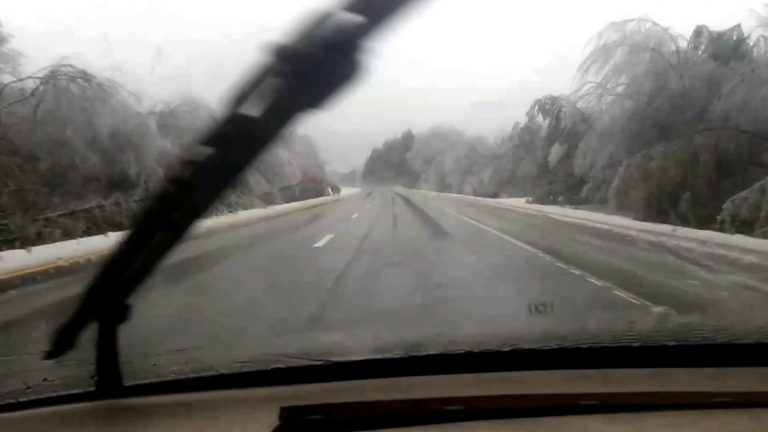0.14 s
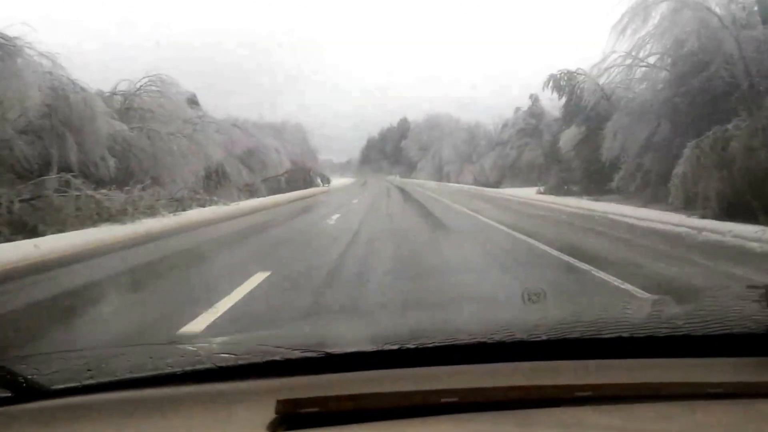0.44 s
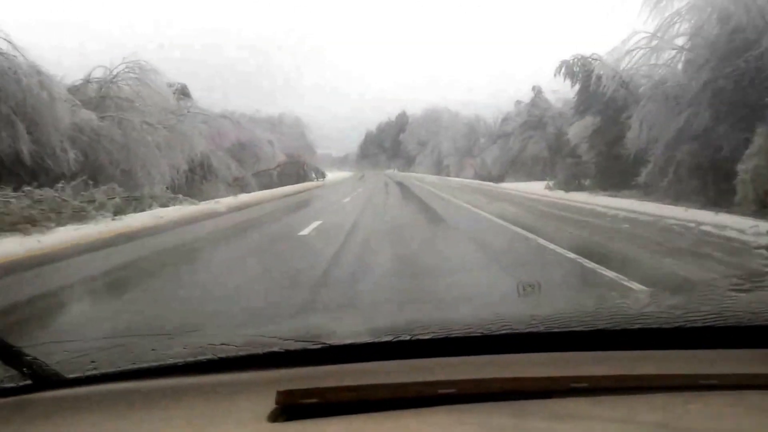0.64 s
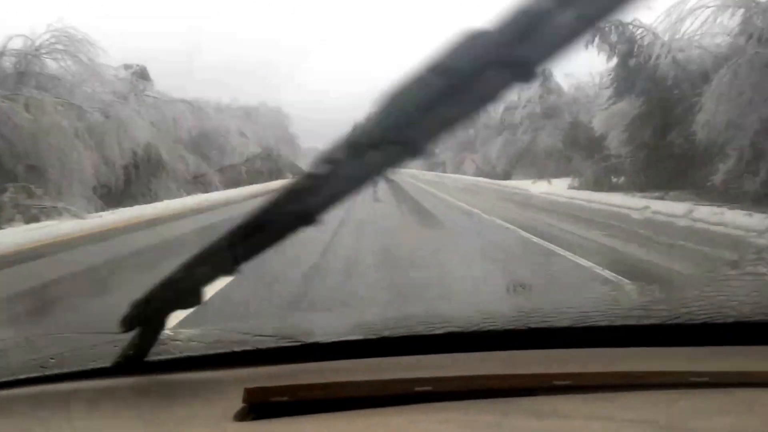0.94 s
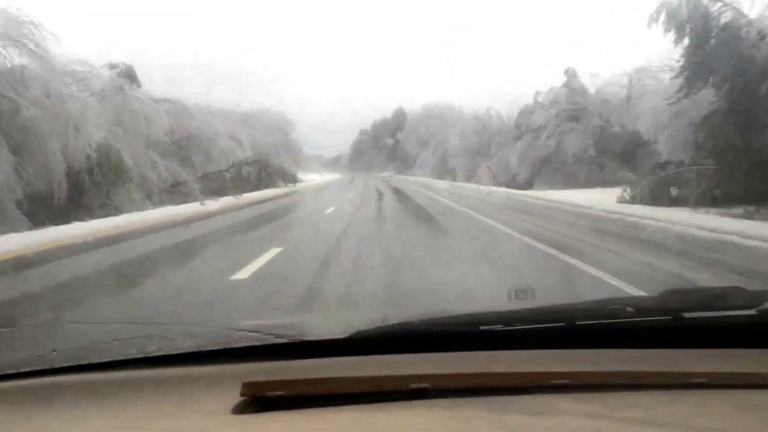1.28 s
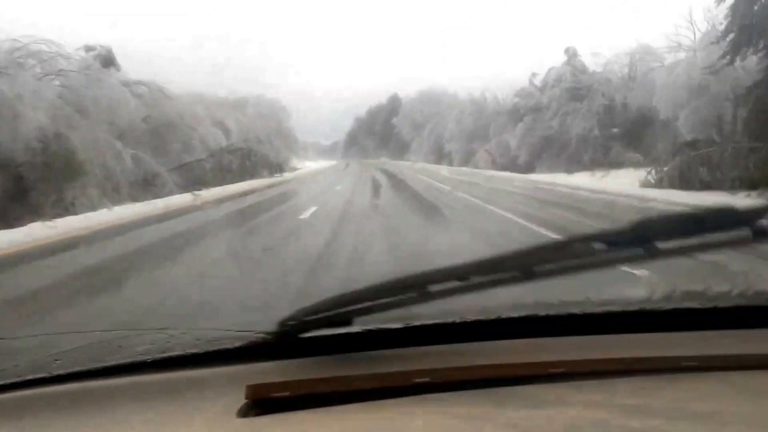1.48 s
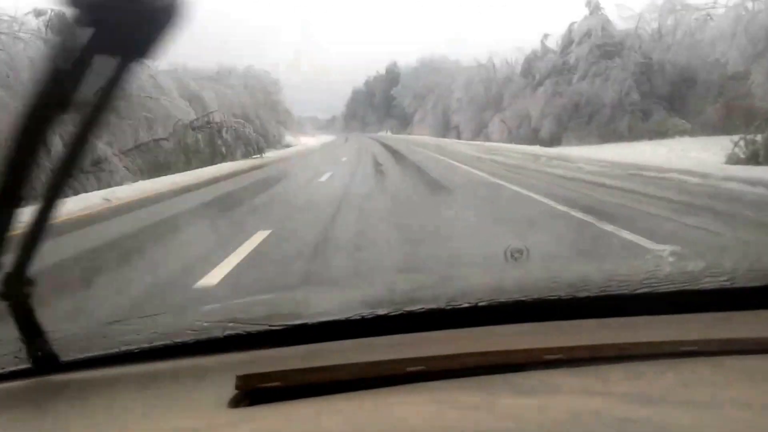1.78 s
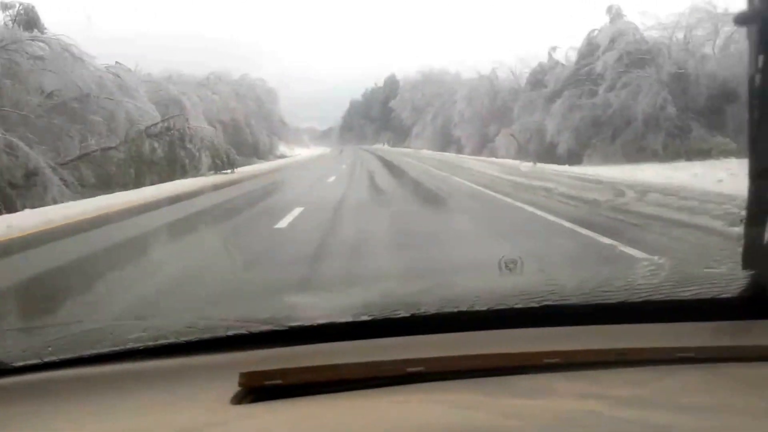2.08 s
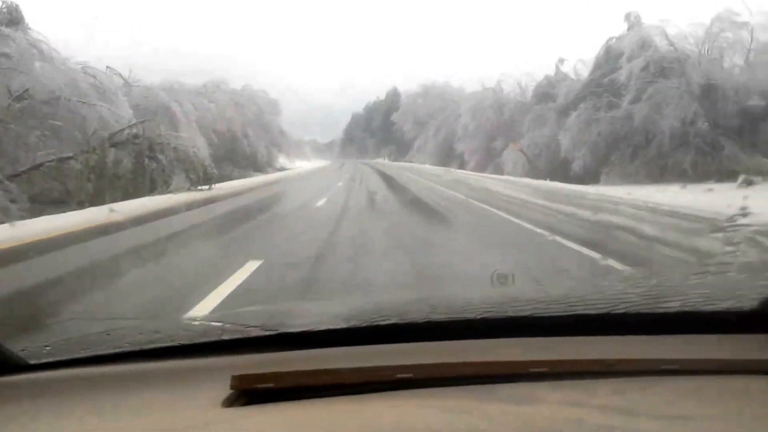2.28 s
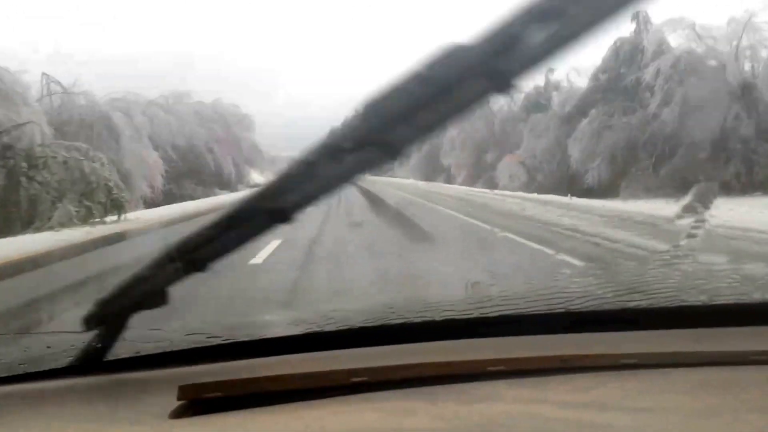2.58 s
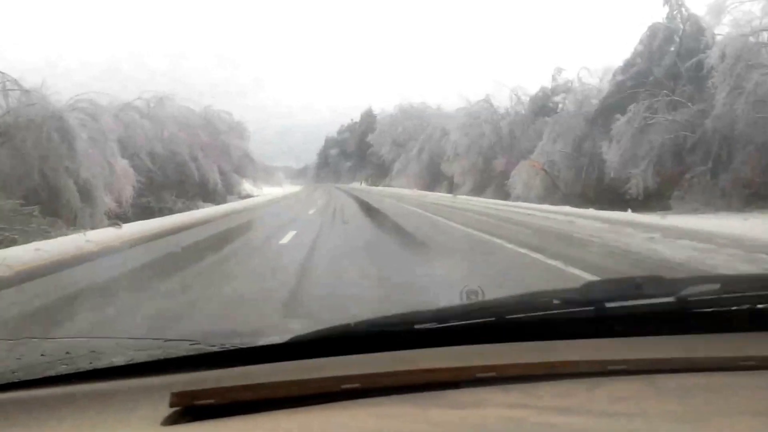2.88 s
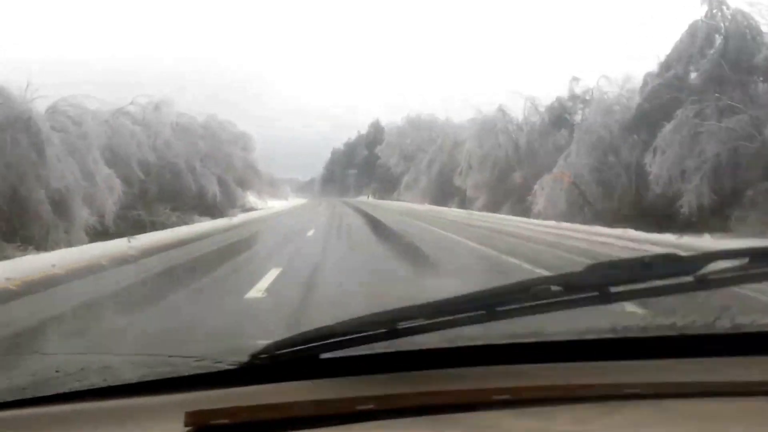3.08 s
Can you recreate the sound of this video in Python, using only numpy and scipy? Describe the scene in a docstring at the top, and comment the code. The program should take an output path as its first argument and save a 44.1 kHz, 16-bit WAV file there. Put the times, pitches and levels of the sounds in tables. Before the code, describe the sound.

Inside a moving car on a wet, icy highway, low tyre rumble and spray hiss continue while sleet patters and ticks on the windscreen, mostly left; everything sags around two seconds, then returns. Close stereo cabin microphones.

```python
"""Tyre rumble and hiss are heard first, then almost at once a sharp tick of sleet on glass.
Place: the small cabin of a car on a wet, icy highway, with two microphones inside.
Shaped noise makes the rumble and spray; wavering tones make the booms, panel hum and faint drivetrain whine.
Pellets ring the windscreen, mostly on the left, with close reflections; many small ones make the patter.
Rumble, spray and patter sag for about a second; a limiter ducks most around the hardest pellet."""
import sys
import numpy as np
from scipy import signal
from scipy.fft import rfft, irfft
from scipy.io import wavfile
from scipy.ndimage import uniform_filter1d, minimum_filter1d

SR = 44100
rng = np.random.default_rng(int(sys.argv[2]) if len(sys.argv) > 2 else 0)


def bounce(signal):
    """Save signal as a 16-bit WAV file at the path given by the first command-line argument."""
    frames = np.transpose(np.atleast_2d(signal))
    limited = np.clip(frames, -1, 1)
    pcm = np.round(limited * 32767).astype(np.int16)
    wavfile.write(sys.argv[1], SR, pcm)


N = 142443  # length [samples]


# Rumble common to both microphones: (frequency [Hz], relative density [dB per Hz])
RUMBLE_SPECTRUM = [(15, -32), (30, -11.5), (48, -7), (60, -5), (75, -1), (98, -3), (114, 0), (138, 0.5),
                   (175, -5), (200, -6.5), (225, -8), (255, -12.5), (300, -11.5), (355, -13.5), (440, -15),
                   (560, -20.5), (800, -23), (1100, -37), (2000, -42), (5000, -90)]
# Rumble that differs between the microphones: (frequency [Hz], relative density [dB per Hz])
RUMBLE_SIDE_SPECTRUM = [(20, -27), (70, 4), (150, 10), (300, 9), (460, -0.5), (600, 5.5), (900, -39),
                        (1400, 3.5), (2200, -5), (5000, -110)]
RUMBLE_DB, RUMBLE_SIDE_DB = -20.5, -36.5  # rms before the swells and the sag
ROAR_HZ, ROAR_SWELL_DB, ROAR_SWELL_PER_S = 223, 1.23, 10.7  # above this the rumble swells on its own


def road():
    """Tyre rumble through the body, nearly the same at both microphones, with an unevenly swelling upper roar."""
    common = level(noise(RUMBLE_SPECTRUM)[0], RUMBLE_DB) + panels_and_whine()
    side = level(noise(RUMBLE_SIDE_SPECTRUM), RUMBLE_SIDE_DB)
    rumble = from_right(common) + side * np.array([[1], [-1]])
    high_pass = signal.butter(2, ROAR_HZ, "high", fs=SR, output="sos")
    roar = signal.sosfiltfilt(high_pass, rumble)
    swell = undb(ROAR_SWELL_DB * walk(ROAR_SWELL_PER_S))
    return rumble + roar * (swell - 1)


# Three body panels, then the drivetrain whine: (pitch [Hz], rms level [dB], pitch wander [share])
PANEL_AND_WHINE_TONES = [(219, -38.5, 0.061), (298.7, -38.5, 0.0595), (416.3, -42, .06),
                         (929, -47.5, 0.00708)]
TONE_FLICKER_DB, TONE_FLICKER_PER_S = 4.5, 24


def panels_and_whine():
    """Body panels hum on and off and the drivetrain whines brokenly: tones of wandering pitch and strength."""
    out = np.zeros(N)
    for hz, db, wander in PANEL_AND_WHINE_TONES:
        tone = waver(hz, wander)
        flicker = undb(TONE_FLICKER_DB * walk(TONE_FLICKER_PER_S))
        out += level(tone * flicker, db)
    return out


# Bumps that set the body booming: (time of the height [s], pitch [Hz], rms level before the fade [dB])
ROAD_BUMPS = [(.08, 112.6, -30), (.12, 291, -33), (0.219, 130.5, -25), (.38, 112, -22), (.40, 300, -26.5),
              (.53, 140, -21), (.77, 114.7, -23), (.81, 196, -26), (.88, 490, -29), (.96, 108.3, -22),
              (1.08, 134.4, -26), (1.11, 405.5, -32), (1.29, 115.8, -19.5), (1.63, 131.1, -31),
              (1.82, 127.1, -27.5), (2.39, 245, -29), (2.46, 114.9, -20), (2.58, 110.1, -24.5),
              (2.61, 288, -31), (2.76, 137.3, -21), (2.82, 330, -28.5), (2.92, 123.2, -16.5),
              (3.03, 124, -19.5), (3.22, 104.9, -18.5)]
BUMP_CYCLES, BOOM_WANDER = 6.2, .07  # cycles from the height to 1/e either side; pitch wander [share]


def bumps():
    """Each bump swells a short, wavering boom in the body; higher panels fade sooner."""
    t = np.arange(N) / SR
    booms = np.zeros(N)
    for s, hz, db in ROAD_BUMPS:
        fade = np.exp(-((t - s) * hz / BUMP_CYCLES) ** 2)
        booms += level(waver(hz, BOOM_WANDER), db) * fade
    return from_right(booms)


LEFT_LAG_S = 0.00021  # the road reaches the right microphone first


def from_right(x):
    """A sound that reaches the left microphone slightly late."""
    t = np.arange(N) / SR
    return np.array([np.interp(t - LEFT_LAG_S, t, x), x])


# Hard pellets on the windscreen, before the limiter:
# (time [s], peak of the ring [dB], crack relative to it [dB], reflections relative to it [dB])
HARD_PELLETS = [(.0408, -7, -1, -11), (.1781, -11, -15, 1), (.2962, -9, -18, -0.5), (.3447, -8, -10, -1),
                (.4173, -9, -14, -14), (.4345, -16, -22, -6), (.4570, -5.5, -19, -4), (.4781, -12, -25, -4),
                (.5548, -9, -20, 2), (.5908, -9.5, -17, -2), (.6138, -10.5, -20, 3), (.6330, -14, -22, -5),
                (.6782, -10, -22, 4.5), (.6840, -18, -22, 9), (.7639, -12.5, -22, 0), (.8353, -7.5, -9, -6),
                (.9874, -10, -22, 4), (1.0497, -15, -20, -1), (1.1500, 1, -10, -11), (1.2424, -9, -22, -3),
                (1.2789, -16, -25, -7), (1.3802, 9, -5, -6.5), (1.3903, -2, -18, 3), (1.5702, -16, -13, -3),
                (1.5874, -22, -10, -7), (1.7168, -15.5, -20, -1), (1.7755, -20, -20, 4),
                (1.8690, -16.5, -14, 0), (2.0579, -23, -18, -1), (2.1299, -13.5, -9, 2.5),
                (2.1522, -21.5, -3, -8), (2.2756, -18, -12, -5), (2.3148, -14, -18, -1),
                (2.3909, -25, -22, -5), (2.4712, -13, -20, -8), (2.6660, -14, -18, 0),
                (2.7746, -17, -12, -9), (2.7846, -0.5, -21, -2.5), (2.8266, -7.5, -16, 1.5),
                (2.8520, -7.5, -20, -2), (2.9024, -8, -10, -5), (2.9290, -16.5, -22, 4),
                (2.9776, -11.5, -25, -4), (3.1420, -3, -27, -9), (3.1932, -9.5, -23, -3)]


def pellets():
    """Hard single pellets tick sharply, each on its own spot of the glass."""
    out = np.zeros((2, N))
    for s, db, crack_db, echo_db in HARD_PELLETS:
        start = int(s * SR)
        tick = impact(crack_db, echo_db)[:, :N - start]
        out[:, start:start + tick.shape[1]] += undb(db) * tick
    return out


# Ring of the glass under a pellet: (frequency [Hz], left relative level [dB], right relative level [dB])
GLASS_RING = [(300, -71, -32), (1830, -26, -46), (2680, -7.5, -30), (3640, -5.5, -10.5), (4760, -5, -12),
              (5740, -2, -14), (6880, -2, -9.5), (7830, -10, -14.5), (10050, -21, -19.5),
              (10070, -51, -18.5), (12300, -78, -29), (14300, -69, -28), (17700, -50, -103)]
PING_HZ, PING_SCATTER, PING_DECAY_S = 6680, .03, .00014  # scatter is a share of the pitch
RIGHT_LAG_S = .0001  # at most: the glass is nearer the left microphone
CRACK_HZ, CRACK_LEFT_DB = 7500, -10  # the crack is weaker on the left
ECHO_DELAY_S = 0.0018  # both tails begin after this
ECHO_DECAY_S, ECHO_DB = 0.0029, 3  # dashboard and side glass
CABIN_DECAY_S, CABIN_DB = 0.013, -4.5


def impact(crack_db, echo_db, size=4096):
    """One spot on the windscreen: a bright crack, a ping of a few cycles, close reflections, a brief cabin tail."""
    t = np.arange(size) / SR
    hz = PING_HZ * (1 + PING_SCATTER * rng.standard_normal())  # pitch differs from spot to spot
    lag = np.array([[0], [RIGHT_LAG_S * rng.random()]])
    arrived = np.maximum(t - lag, 0)
    ping = arrived * np.sin(2 * np.pi * hz * arrived) * np.exp(-arrived / PING_DECAY_S)
    ring = response(GLASS_RING)[:, :size // 8]
    ring = ring / np.abs(ring).max()
    direct = signal.fftconvolve(ping, ring, axes=1)

    high_pass = signal.butter(2, CRACK_HZ, "high", fs=SR, output="sos")
    snap = signal.sosfilt(high_pass, signal.unit_impulse(direct.shape[1]))
    crack = snap * undb([[crack_db + CRACK_LEFT_DB], [crack_db]])

    echo = undb(ECHO_DB) * tail(ECHO_DECAY_S, size)
    cabin = undb(CABIN_DB) * tail(CABIN_DECAY_S, size)
    reflections = signal.fftconvolve(echo + cabin, ring, axes=1)
    return direct / np.abs(direct).max() + crack + undb(echo_db) * reflections


def tail(decay, size):
    """Dense reflections as delayed, fading noise, unrelated at the two microphones and of about unit energy."""
    age = np.arange(size) / SR - ECHO_DELAY_S
    fade = (age > 0) * np.exp(-np.abs(age) / decay)
    return rng.standard_normal((2, size)) * fade * np.sqrt(2 / (decay * SR))


# Strength of the patter, on top of the sag: (time [s], level [dB])
SLEET_STRENGTH = [(0, -1), (.4, -2.5), (.6, 1), (.8, -3), (1.1, -2), (1.3, 1.5), (1.52, 3), (1.65, -5.5),
                  (1.9, -2.5), (2.1, -.5), (2.2, -10.5), (2.4, -2.5), (2.65, -1.5), (2.88, -0.5),
                  (3.05, -4.5), (3.23, -5)]
PATTER_PER_S, PATTER_SCATTER_DB = 800, 3.3  # the scatter scales an exponential draw
PATTER_DB = -28.5  # rms before the sleet strength and the sag
PATTER_CRACK_DB, PATTER_ECHO_DB = -26, -2.5  # relative to the peak of each ring


def patter(count=12):
    """Many small pellets of scattered size, landing on a dozen spots of the windscreen."""
    out = 0
    for _ in range(count):
        lands = rng.random(N) < PATTER_PER_S / count / SR
        size_db = PATTER_SCATTER_DB * np.minimum(rng.exponential(size=N), 4.5)
        hits = (lands * undb(size_db))[None]
        spot = impact(PATTER_CRACK_DB, PATTER_ECHO_DB)
        out = out + signal.fftconvolve(hits, spot, axes=1)[:, :N]
    return level(out, PATTER_DB) * undb(curve(SLEET_STRENGTH))


# Modes of the wiper arm: (pitch [Hz], level at the start [dB])
WIPER_MODES = [(900, -43), (1030, -21), (1130, -39)]
KNOCK_S, KNOCK_DECAY_S = .0765, 0.0073


def wiper_knock():
    """One soft, dull knock of the wiper arm: a few close modes that die away together."""
    age = np.maximum(np.arange(N) / SR - KNOCK_S, 0)
    modes = sum(undb(db) * np.sin(2 * np.pi * hz * age) for hz, db in WIPER_MODES)
    return modes * np.exp(-age / KNOCK_DECAY_S)


# Tyre spray and air rush: (frequency [Hz], left relative density [dB per Hz], right [dB per Hz])
SPRAY_SPECTRUM = [(296, -31.5, -30), (796, 0.5, 0), (1680, -2, -5), (2000, -3.5, -8.5), (2720, 1, -2.5),
                  (3200, -5, -8), (4140, -4, -15), (7000, -1, -22), (8660, -14, -11), (9360, -13, -20.5),
                  (10500, -53, -24), (12300, -70, -26), (14500, -48, -38)]
SPRAY_DB = -30  # rms before the sag
SPRAY_FLICKER_DB, SPRAY_FLICKER_PER_S = 1.14, 25.05


def spray():
    """Flickering hiss of water off the tyres and air over the glass, as shaped noise."""
    flicker = undb(SPRAY_FLICKER_DB * walk(SPRAY_FLICKER_PER_S))
    return level(noise(SPRAY_SPECTRUM) * flicker, SPRAY_DB)


def undb(db):
    """Decibels to gain."""
    return 10 ** (np.asarray(db) / 20)


def level(x, db):
    """Scale to an rms level."""
    return x * undb(db) / np.sqrt(np.mean(x ** 2))


def curve(rows):
    """Join (time [s], value) rows by straight lines."""
    return np.interp(np.arange(N) / SR, *np.array(rows).T)


def walk(rate):
    """Slow random wander with a spread near 1, from a smoothed new value at each step of the rate [per s]."""
    k = int(SR / rate)
    steps = np.repeat(rng.standard_normal(N // k + 1), k)
    return 1.29 * uniform_filter1d(uniform_filter1d(steps, k), k)[:N]


def waver(hz, wander):
    """A tone whose pitch wanders by a share of itself."""
    cycles = np.cumsum(hz * (1 + wander * walk(40))) / SR
    return np.sin(2 * np.pi * (rng.random() + cycles))


def response(rows, size=8192):
    """Causal (minimum-phase) impulse responses, one for each dB column of a spectrum table."""
    hz, *columns = np.array(rows, float).T
    grid = np.log(np.maximum(np.fft.rfftfreq(size, 1 / SR), 1))
    log_gains = [np.log(undb(np.interp(grid, np.log(hz), db))) for db in columns]
    cepstrum = irfft(log_gains)
    cepstrum[:, 1:size // 2] *= 2  # folding the cepstrum makes the response causal
    cepstrum[:, size // 2 + 1:] = 0
    return irfft(np.exp(rfft(cepstrum)))


def noise(rows):
    """Unrelated noise for each dB column of a spectrum table."""
    ir = response(rows)
    white = rng.standard_normal((len(ir), N + ir.shape[1] - 1))
    return signal.fftconvolve(white, ir, mode="valid", axes=1)


# Overall level of the ride: (time [s], level [dB])
RIDE_SAG = [(0, 1), (1.0, 0.5), (1.33, 2), (1.55, -3), (1.8, -7.5), (2.0, -7.5), (2.22, -8), (2.42, -2),
            (2.7, -0.5), (2.95, 0), (3.23, 0.5)]
# Swells of the rumble with the road surface: (time [s], level [dB])
ROAD_SURFACE = [(0, 2), (.12, 2), (.25, 1), (.39, .5), (.47, 0.5), (.65, 0), (.92, 0.5), (1.1, 0),
                (1.18, -1.5), (1.25, -1.5), (1.45, -2), (1.65, 0), (1.85, 0), (2.08, -2.5), (2.2, 1),
                (2.42, -1.5), (2.7, -1), (2.77, -2), (2.88, 1), (3.1, 0), (3.23, 0)]
RUMBLE_SAG = 0.79  # share of the sag, in dB, that the rumble takes


def scene():
    """Road, spray and patter rise and sag together under the booms, the hard ticks and the knock."""
    sag_db = curve(RIDE_SAG)
    rumble = road() * undb(RUMBLE_SAG * sag_db + curve(ROAD_SURFACE))
    hiss_and_patter = (spray() + patter()) * undb(sag_db)
    return rumble + bumps() + pellets() + hiss_and_patter + wiper_knock()


LIMIT_DB, LIMIT_SLOPE = 0, .62  # threshold; dB of ducking per dB over it
LOOKAHEAD_S, RELEASE_S = .011, .045
CEILING, TOP_HZ = .93, 14800  # clipping amplitude; upper edge of the sound


def record(dry):
    """A look-ahead limiter ducks around peaks over its threshold; what still passes the ceiling clips; the top is cut."""
    peak_db = 20 * np.log10(np.abs(dry).max(axis=0) + 1e-9)
    over_db = np.maximum(peak_db - LIMIT_DB, 0)
    fade = np.exp(-np.arange(N) / SR / RELEASE_S)
    held_db = np.maximum.accumulate(over_db / fade) * fade  # each peak is held and released
    lead = int(LOOKAHEAD_S * SR)
    early_db = minimum_filter1d(-LIMIT_SLOPE * held_db, 2 * lead + 1)  # ducks ahead of the peak
    duck_db = uniform_filter1d(early_db, lead // 2)
    clipped = np.clip(dry * undb(duck_db), -CEILING, CEILING)
    low_pass = signal.ellip(10, .2, 90, TOP_HZ, fs=SR, output="sos")
    return signal.sosfilt(low_pass, clipped)


dry = scene()
out = record(dry)
bounce(out)
```